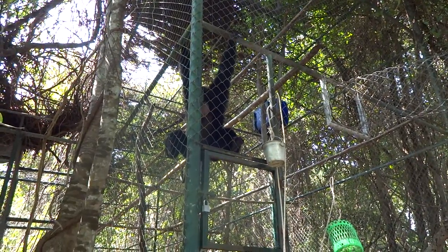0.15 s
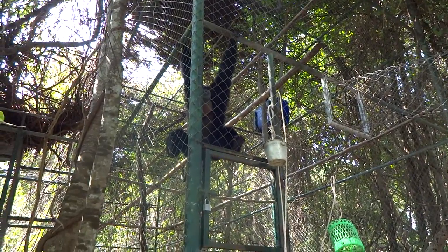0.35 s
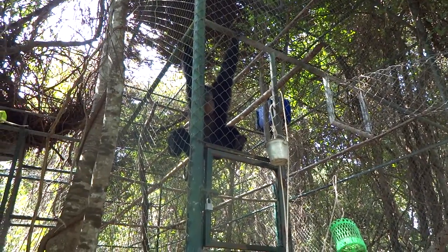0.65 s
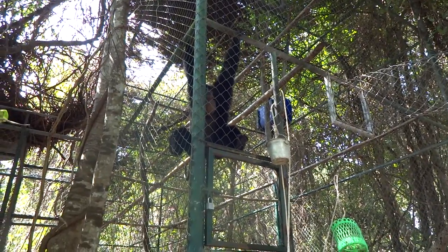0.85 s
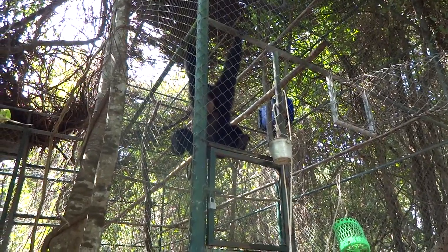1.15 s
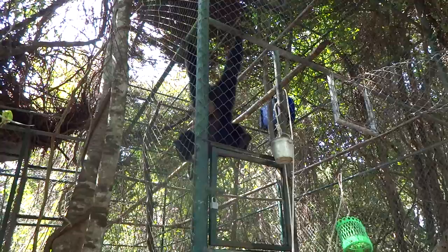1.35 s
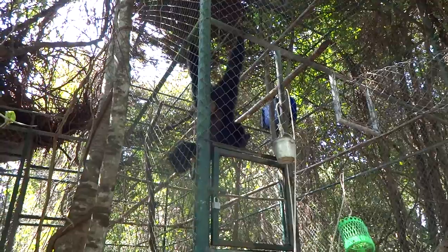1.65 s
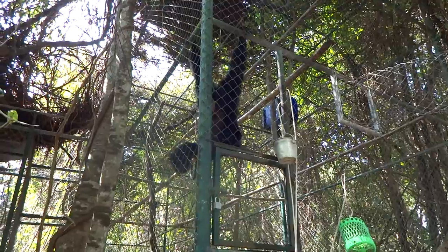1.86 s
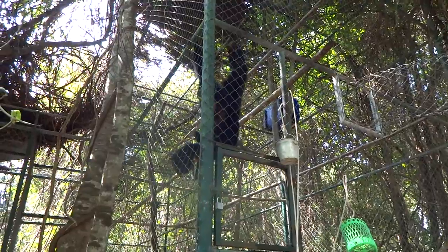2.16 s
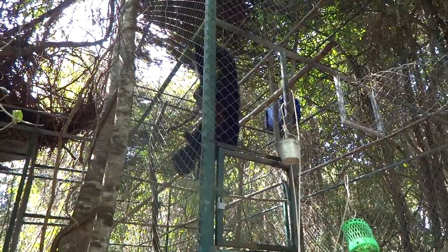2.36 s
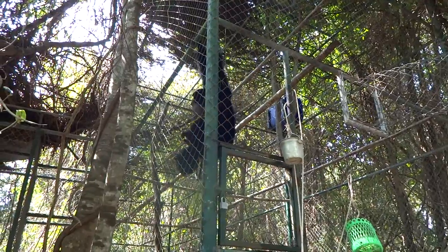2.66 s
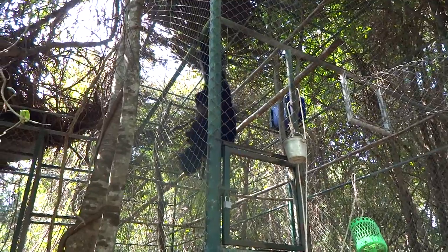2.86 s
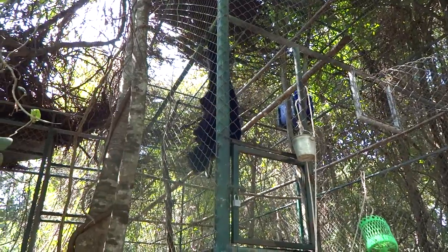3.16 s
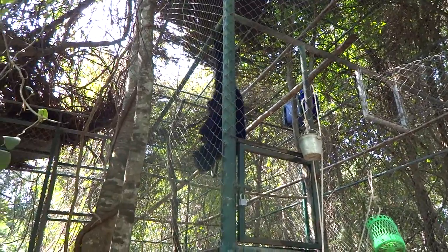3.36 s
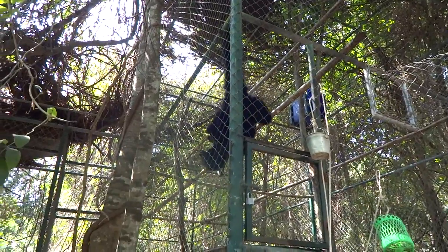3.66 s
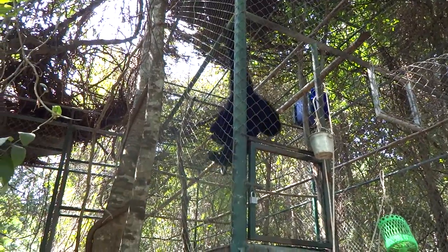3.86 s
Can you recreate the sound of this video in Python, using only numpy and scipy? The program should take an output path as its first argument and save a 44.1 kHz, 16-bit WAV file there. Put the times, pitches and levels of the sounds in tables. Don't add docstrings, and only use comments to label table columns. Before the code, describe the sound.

A large gibbon's loud falling barks alternate with soft low booms, quickening among echoing trees.

```python
import sys
import numpy as np
from scipy import signal
from scipy.fft import rfft, irfft
from scipy.io import wavfile

SR = 44100
rng = np.random.default_rng(int(sys.argv[2]) if len(sys.argv) > 2 else 0)


def elevation(decibels):
    levels = np.asarray(decibels, float)
    return 10 ** (levels / 20)


def digitize_waveform(pressure):
    field = np.atleast_2d(pressure).T
    bounded = np.clip(field, -1, 1)
    quanta = np.round(bounded * 32767).astype(np.int16)
    wavfile.write(sys.argv[1], SR, quanta)


N = 176400
M = N + SR
T = np.arange(M) / SR - 1

# start in seconds, length in seconds, top pitch in Hz, end pitch in Hz,
# share of the bark where half the fall is done.
BARKS = [(-.95, .155, 740, 620, .75), (.086, .15, 750, 620, .8), (.971, .154, 740, 618, .76),
         (1.363, .106, 724, 530, .68), (1.632, .1, 700, 528, .66), (1.921, .1, 715, 532, .66),
         (2.207, .1, 710, 522, .68), (2.52, .097, 730, 535, .65), (2.822, .097, 738, 550, .65),
         (3.176, .1, 733, 525, .72), (3.531, .113, 728, 530, .74), (3.895, .112, 731, 530, .74)]
# multiple of the pitch, level in dB.
BARK_PARTIALS = [(1, -2), (2, 0), (3, -23), (4, -39), (5, -34), (6, -23), (7, -31), (8, -31), (9, -30),
                 (10, -43), (11, -46), (12, -57), (13, -54), (14, -51)]
# centre in Hz, width in Hz, level in dB.
RASP_BANDS = [(1000, 1200, -14), (2600, 600, 5.5), (3200, 800, 3), (4600, 1400, -1), (6300, 2000, -5),
              (8300, 2000, -12)]


def barks():
    scoop_hz, scoop_s, arch_hz = 170, .0105, 8
    attack_s, release_s = .009, .006
    fall_spread = .115
    hz = np.full(M, 600.)
    env, drop, scoop = np.zeros((3, M))
    for start, length, top, end, mid in BARKS:
        at, t = span(start, length + .03)

        def ease(u):
            return 1 / (1 + np.exp((mid - u) / fall_spread))

        fall = (ease(t / length) - ease(.3)) / (ease(1) - ease(.3))
        drop[at] = np.clip(fall, 0, 1)
        scoop[at] = np.exp(-t / scoop_s / 2)
        hz[at] = top + arch_hz - scoop_hz * scoop[at] ** 2 - (top - end) * np.maximum(fall, -.02)
        attack = 1 - np.exp(-(t / attack_s) ** 2)
        env[at] = attack / (1 + np.exp((t - length) / release_s * 4))

    jitter = (.003 + .02 * drop) * walk(300)
    phase = 2 * np.pi * np.cumsum(hz * (1 + jitter)) / SR
    treble_db = turn(column=2)
    shade_db = -12 * drop - 8 * scoop + treble_db
    shimmer_db = 3.5 * walk(40)
    on = env > 0
    tone = np.zeros(M)
    for k, db in BARK_PARTIALS:
        change_db = min(.25 * k - .05, 1) * np.roll(shimmer_db, 7919 * k)
        if k > 2:
            change_db = change_db + shade_db
        tone[on] += elevation(db + throat(k * hz[on]) + change_db[on]) * np.sin(k * phase[on] + k * k)

    puffs = rng.standard_normal(M) * (1 + np.cos(phase))
    breath = (.1 + .5 * scoop + np.sqrt(drop)) * env
    breath = breath * elevation(3.5 * walk(70) + np.maximum(treble_db, 2.5))
    rasp = sum(elevation(db) * band(puffs * breath, f, width) for f, width, db in RASP_BANDS)
    return elevation(-13.8) * (-np.sqrt(2) * env * tone + elevation(-21.5) * rasp)


# centre
# in Hz, width in Hz, lift in dB.
THROAT_RESONANCES = [(615, 30, 5.5), (658, 25, -6), (1100, 250, -4), (1750, 300, -8), (2500, 200, 14),
                     (2950, 300, 8), (3500, 250, 7), (5400, 400, 4), (7700, 900, 7)]


def throat(hz):
    return sum(db / (1 + ((hz - f) / (width / 2)) ** 2) for f, width, db in THROAT_RESONANCES)


# start in seconds, length in seconds, pitch in Hz, level in dB, overtone level in dB.
BOOMS = [(-.7, .5, 256, -15, -6), (.32, .515, 256, -14.5, 0), (1.194, .188, 265, -12, 5),
         (1.53, .136, 265, -13, 5), (1.838, .106, 268, -14, 3), (2.113, .115, 266, -14, 3),
         (2.43, .108, 269, -16, -5), (2.716, .118, 266, -16, -7), (3.05, .138, 266, -14, -9),
         (3.387, .152, 258, -13.5, -9), (3.726, .17, 257, -12.5, -9)]
# multiple of the pitch, level in dB,
# share of the boom where loudest, spread as a share of the boom.
BOOM_OVERTONES = [(2, -42, .5, .5), (3, -52, .5, .4), (7, -50, .6, .12), (9, -44, .76, .16),
                  (13, -58, .95, .15), (15, -56, .65, .1), (21, -65, .7, .15), (22, -62, .62, .1)]


def booms():
    crest, sharpness = .62, 1.3
    out = np.zeros(M)
    flutter_db = 2.5 * walk(12)
    rumble = elevation(-55) * 30 * band(rng.standard_normal(M), 75, 40)
    for start, length, pitch, db, over_db in BOOMS:
        at, t = span(start, length)
        u = np.clip(t / length, 0, 1)
        rise = np.sin(np.pi / 2 * u / crest).clip(0) ** sharpness
        fall = np.cos(np.pi / 2 * (u - crest) / (1 - crest)).clip(0) ** sharpness
        env = np.where(u < crest, rise, fall)

        hz = pitch + 32 * np.exp(-t / .016) + 11 * (u - .5)
        phase = 2 * np.pi * np.cumsum(hz + 11 * np.exp((t - length) / .03)) / SR
        sagging_phase = 2 * np.pi * np.cumsum(hz - 22 * np.exp((t - length) / .045)) / SR
        over = np.zeros(len(t))
        for k, d, centre, spread in BOOM_OVERTONES:
            level = elevation(d + over_db + flutter_db[at]) * np.exp(-((u - centre) / spread) ** 2)
            over += level * np.sin(k * sagging_phase)
        swell = env * (np.sin(phase) + rumble[at])
        out[at] += elevation(db) * np.sqrt(2) * (swell + env ** .4 * over)
    return out


# start in seconds, chirp level in dB, hiss level in dB.
POPS = [(.335, -36, -70), (1.215, -46, -68), (1.34, -27, -50), (1.613, -38, -47), (1.898, -29, -46),
        (2.183, -27, -49), (2.493, -39, -52), (2.795, -33, -51), (3.143, -41, -56), (3.496, -33, -60),
        (3.86, -44, -61)]


def pops():
    chirp_hz, glide_hz, chirp_s, hiss_s = 950, 260, .014, .02
    out = np.zeros(M)
    rough = 1 + .35 * walk(300)
    noise = rng.standard_normal(M)
    hiss = band(noise, 6200, 2600) + .7 * band(noise, 3800, 900) + .6 * band(noise, 8300, 900)
    for start, chirp_db, hiss_db in POPS:
        at, t = span(start, .06)
        hz = chirp_hz + glide_hz * np.minimum(t / chirp_s, 1.5)
        chirp = np.sin(2 * np.pi * np.cumsum(hz) / SR) * rough[at]
        attack = np.minimum(t / .004, 1)
        out[at] += elevation(chirp_db) * 1.4 * chirp * attack * np.exp(-(t / chirp_s) ** 2)
        out[at] += elevation(hiss_db) * 2.5 * hiss[at] * attack * np.exp(-(t / hiss_s) ** 2)
    return out


# time in seconds, echo gain in dB, treble in dB.
SWING = [(0, -2, -5), (1.1, -2, -2), (1.5, -2, 2), (2.3, -1, 4), (2.8, 2.5, 1.2), (4, 2.5, 1.2)]


def turn(column):
    rows = np.array(SWING).T
    return np.interp(T, rows[0], rows[column])


# delay in seconds, left level in dB, right level in dB.
ECHOES = [(.0045, -18, -20), (.011, -16, -19), (.022, -16, -14), (.033, -22, -25), (.058, -25, -23)]
# nominal frequency in Hz, near level in dB, near t60 in seconds,
# far level in dB, far t60 in seconds.
TAIL_BANDS = [(260, -30, .15, -23, 1.3), (700, -16, .35, -19, 1.4), (1400, -18, .3, -21, 1.5),
              (3000, -5.5, .45, -13, 1.0), (7000, -7, .3, -14, .75)]


def space(x):
    alike = .55
    t = np.arange(2 * SR) / SR
    noise = rng.standard_normal((3, len(t)))
    noise = np.sqrt(alike) * noise[0] + np.sqrt(1 - alike) * noise[1:]
    spectrum = rfft(noise)
    hz = np.arange(SR + 1) / 2
    edges_hz = [0, 420, 950, 1900, 4800, SR]
    response = np.zeros_like(noise)

    def fade(db, t60):
        return elevation(db - 60 * t / t60) * np.sqrt(14 / t60 / SR)

    for k, (_, near_db, near_t60, far_db, far_t60) in enumerate(TAIL_BANDS):
        decay = fade(near_db, near_t60) + fade(far_db, far_t60)
        decay = decay * np.minimum(t / .03, 1)
        inside = (hz >= edges_hz[k]) & (hz < edges_hz[k + 1])
        response += irfft(spectrum * inside) * decay
    for delay, left_db, right_db in ECHOES:
        response[:, int(delay * SR)] += elevation(np.array([left_db, right_db]))
    sent = x * elevation(turn(column=1))
    return signal.fftconvolve(sent[None], response, axes=1)[:, :M]


# frequency in Hz, spectral density in dB per Hz.
HUSH_SPECTRUM = [(30, -17), (80, -9), (200, -3), (400, -12), (1000, -16), (2500, -26), (6000, -36),
                 (11000, -50)]


def air():
    hz, db = np.array(HUSH_SPECTRUM).T
    bins_hz = np.arange(M // 2 + 1) * SR / M
    gain = elevation(np.interp(np.log(bins_hz + 1), np.log(hz), db))
    mid, side = irfft(rfft(rng.standard_normal((2, M))) * gain, M)
    stereo = mid + .2 * side * np.array([[1], [-1]])
    return stereo * elevation(-68 + 1.5 * walk(2)) / mid.std()


def band(x, hz, width):
    sos = signal.butter(2, [hz - width / 2, hz + width / 2], "band", fs=SR, output="sos")
    return signal.sosfilt(sos, x)


def walk(rate):
    x = signal.lfilter(*signal.butter(2, rate, fs=SR), rng.standard_normal(M))
    return x / x.std()


def span(start, length):
    i = int((start + 1) * SR)
    at = slice(i, min(i + int(length * SR), M))
    return at, T[at] - start


def scene():
    calls = barks() + pops()
    deep = booms()
    balance_db = np.array([[.6], [-.6]]) / 2
    direct = (calls + deep) * elevation(balance_db)
    reflected = space(calls + elevation(-8) * deep)
    return (direct + reflected + air())[:, -N:]


def band_limit(x):
    return signal.sosfilt(signal.butter(12, 11330, fs=SR, output="sos"), x)


def record(dry):
    warped = np.tanh(.6 * (dry + .035 * dry ** 2)) / .6
    mix = signal.sosfilt(signal.butter(2, [22, 10200], "band", fs=SR, output="sos"), warped)
    return band_limit(mix)


dry = scene()
out = record(dry)
digitize_waveform(out)
```